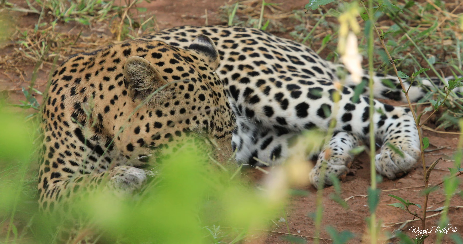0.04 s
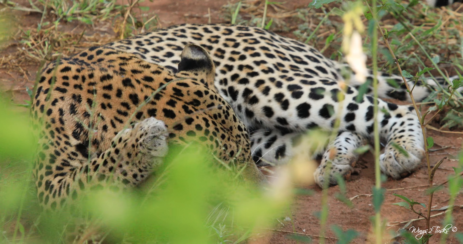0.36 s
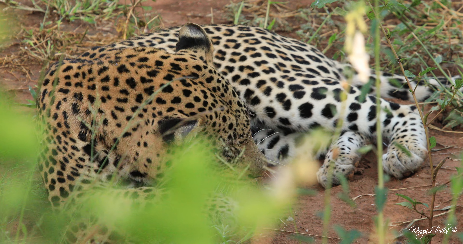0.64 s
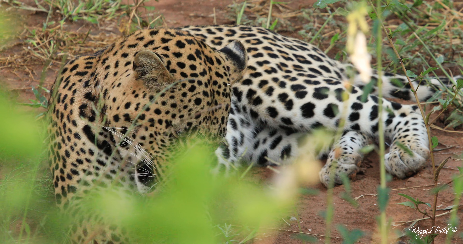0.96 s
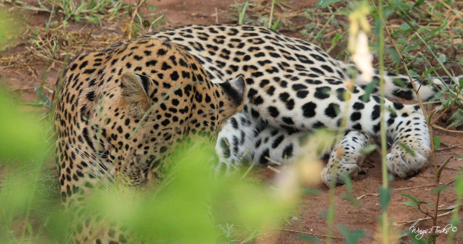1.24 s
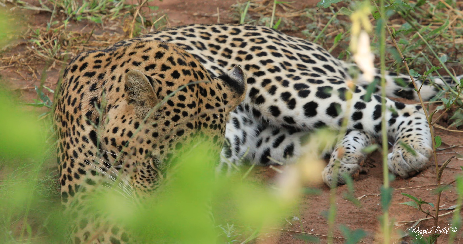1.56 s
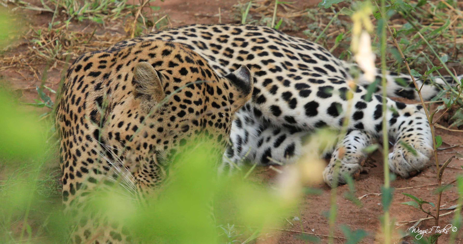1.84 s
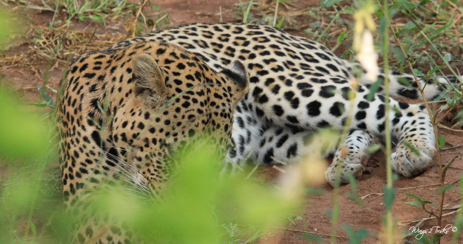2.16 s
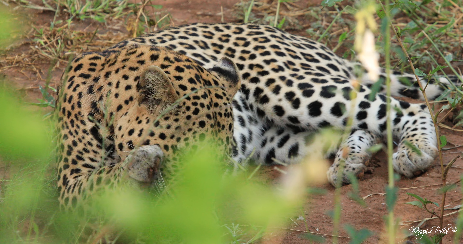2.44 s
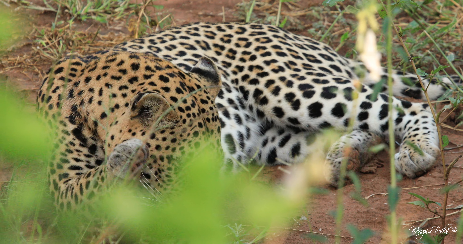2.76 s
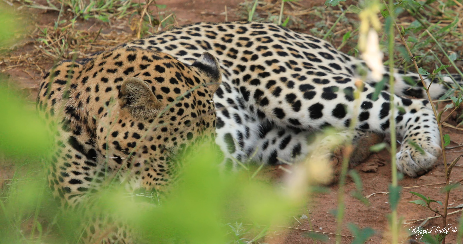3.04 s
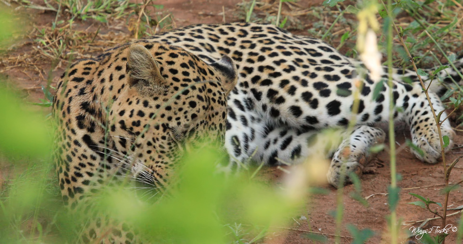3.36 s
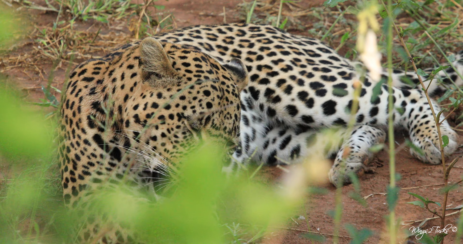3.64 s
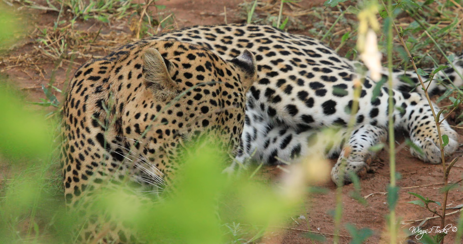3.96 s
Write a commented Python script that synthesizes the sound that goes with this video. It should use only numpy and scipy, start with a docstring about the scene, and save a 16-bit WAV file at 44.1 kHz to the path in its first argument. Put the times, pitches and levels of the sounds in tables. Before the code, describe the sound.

Cicadas drone high and steady throughout over soft outdoor air. A bird gives a short falling whistle five times, roughly once a second, while others twitter farther off. A faint distant engine hum fades by 1.3 seconds. A leopard's licking makes scattered soft wet clicks. At about 2.8 seconds a paw brushes once over dry ground, and a nearer cicada starts buzzing, its throb swelling until the end at 4 seconds.

```python
"""Cicadas drone in bushland over soft air and the hum of a distant engine, which fades.
One bird repeats a falling whistle; others glide and twitter farther off, scattered by trunks and leaves.
A leopard grooms itself, its tongue making soft wet clicks. Late on, a nearer cicada starts up and
throbs as the ribs of its two timbals buckle in turn, and a paw brushes once over dry ground."""
import sys
import numpy as np
from scipy import signal
from scipy.fft import rfft, irfft
from scipy.io import wavfile
from scipy.ndimage import uniform_filter1d

SR = 44100
rng = np.random.default_rng(int(sys.argv[2]) if len(sys.argv) > 2 else 0)


def persist_wave(psi):
    """Save psi, clipped to +-1, as 16-bit WAV."""
    counts = np.round(np.clip(psi, -1, 1) * 32767).astype(np.int16)
    wavfile.write(sys.argv[1], SR, np.atleast_2d(counts).T)


N = 176400
TIME = np.arange(N) / SR

# Tone of the air and far insects: (frequency [Hz], relative level [dB])
AIR_COLOUR = [(15, -4), (40, 0.5), (90, -5.5), (170, -3.5), (300, -11.5), (600, -11.5), (1000, -17),
              (1500, -15), (2200, -17), (3300, -19), (3800, -16), (4250, -9.5), (4800, -15.5),
              (6200, -19.5), (9000, -24.5), (11500, -22), (16000, -21.5)]
# Ride on the air's low end: (time [s], gain [dB])
AIR_BASS = [(0, 1.5), (1.5, 2), (2.6, -2.5), (3.4, -5.5), (4, -2)]
# How alike left and right are in the air: (frequency [Hz], correlation [0-1])
AIR_LIKENESS = [(30, 0.98), (120, 0.98), (280, 0.92), (1000, 0.82), (4000, 0.96), (9000, 0.63),
                (12000, 0.41), (16000, 0.35)]
# Patchy flicker of the air: (frequency [Hz], rms depth [dB])
AIR_FLICKER = [(300, 2.4), (1000, 1.58), (3000, 3.4), (4300, .7), (8000, 0.36)]
# Engine fade: (time [s], level [dB])
ENGINE_LEVEL = [(0, -53.5), (.75, -51), (1.1, -55.5), (1.35, -66), (2.5, -62), (4, -65.5)]
# Engine harmonics: (multiple of the fundamental, relative level [dB])
ENGINE_HARMONICS = [(1, 2), (2, -7.5), (3, -16.5), (4, -13)]

# Far cicadas, one a row: (burst rate [Hz], click rate [Hz], relative level [dB])
FAR_SINGERS = [(43.36, 505, 0), (41.2, 565, -3), (45.1, 410, -3)]
# Their drone: (time [s], level [dB])
FAR_LEVEL = [(0, -55), (1, -56), (2, -55.5), (4, -57)]
# Their tone: (frequency [Hz], relative level [dB])
FAR_COLOUR = [(5500, -37), (6400, -25), (6950, -6), (7450, -6), (8050, -1), (8500, -2), (9050, -3),
              (9500, -7), (9800, -18), (10100, -6), (10900, -41), (13000, -40)]
# Ringing bands of their bodies: (frequency [Hz], lift [dB])
FAR_RINGS = [(6570, 12.5), (6960, 3.5), (7430, 5), (8030, 5), (8480, 3), (9020, 10), (9400, 9.5),
             (10050, 5), (10380, 11)]

# Falling whistles: (start [s], length [s], pitch [Hz], level [dB], extra gain at the onset [dB])
FALLS = [(0.0, 0.21, 2190, -42, -13), (0.991, .195, 2220, -42, 0.5), (1.742, .21, 2212, -44, 4.5),
         (2.664, .22, 2103, -43, -13.5), (3.644, 0.2, 2154, -46, -13)]
# Contour of each fall: (position in the note [0-1], pitch [ratio], gain [dB])
FALL_SHAPE = [(0, 1.1, -6), (0.089, 1.1, -2), (0.198, 1.035, -2), (0.348, 1.005, -1), (.6, .98, -10),
              (0.818, .97, -10.5), (.93, .86, -12), (1, 0.823, -17)]
# Clear bird notes: (start [s], length [s], first pitch [Hz], middle [Hz], last [Hz], level [dB])
GLIDING_NOTES = [ (-.02, 0.24, 2710, 2850, 2664, -60.5), (.27, 0.12, 1227, 1147, 1100, -60.5),
                 (0.328, 0.2, 2746, 2870, 2670, -58), (.38, 0.067, 2100, 2080, 2060, -62.5),
                 (0.515, 0.0528, 1876, 1646, 1513, -47.5), (0.59, 0.017, 1640, 1618, 1550, -51),
                 (0.665, 0.21, 2750, 2915, 2670, -60), (0.926, .022, 2670, 2450, 2400, -51.5),
                 (0.977, 0.11, 2770, 2900, 2690, -64), (1.21, .12, 1213, 1140, 1100, -59.5),
                 (1.671, 0.023, 2550, 2400, 2350, -51), (2.234, 0.0735, 1662, 1598, 1588, -48),
                 (2.601, 0.018, 2480, 2350, 2280, -52.5), (2.92, 0.048, 1257, 1156, 1090, -60),
                 (3.48, .17, 2770, 2890, 2750, -64), (3.576, 0.029, 2570, 2550, 2430, -55),
                 (3.803, 0.14, 2770, 2870, 2780, -62.5), (3.875, 0.085, 1160, 1107, 1050, -62),
                 (3.9, 0.15, 2220, 2116, 2050, -64.5)]
# Twitters: (start [s], length [s], first pitch [Hz], middle [Hz], last [Hz], level [dB],
# rasp [share of pitch])
TWITTERS = [(0.032, 0.041, 3950, 3620, 6400, -57.5, .006), (0.07, 0.075, 6200, 5760, 4930, -58, .01),
            (0.139, 0.042, 4880, 5670, 5530, -55.5, 0.0088), (1.381, 0.11, 5140, 5250, 5090, -60, 0.012),
            (1.76, 0.075, 4330, 5520, 5500, -59, 0.012), (1.824, 0.064, 4900, 4670, 5480, -55.5, .012),
            (2.012, .045, 3310, 3074, 2860, -53.5, 0.028), (2.056, 0.048, 2800, 2980, 3620, -56.5, 0.024),
            (2.046, 0.093, 5250, 5470, 4830, -61.5, .015), (2.303, 0.062, 3050, 2830, 2580, -59.5, .02),
            (2.612, .18, 4060, 3730, 3540, -54.5, .07), (2.929, 0.13, 5700, 5530, 5540, -59, .02),
            (3.024, 0.082, 6370, 6000, 6100, -55, .03), (3.243, 0.088, 6350, 6100, 6000, -49, 0.04),
            (3.411, 0.12, 6310, 6070, 5910, -52.5, 0.031)]
# Tongue clicks: (time [s], level [dB], centre [Hz], decay [s])
LICKS = [(.019, -41, 980, 0.0016), (0.01, -49.5, 3170, .006), (.169, -55, 3000, 0.0035),
         (.175, -52.5, 690, 0.0083), (.85, -54.5, 600, 0.011), (1.288, -45, 2850, .003),
         (1.362, -53, 1610, 0.021), (1.789, -49, 970, .005), (1.92, -48.5, 800, 0.0096),
         (1.969, -45, 834, 0.011), (1.993, -44.5, 770, 0.0076), (2.181, -51, 660, .005),
         (2.303, -49, 3440, 0.0051), (2.345, -50, 1900, .007), (2.623, -53, 1240, 0.0067),
         (2.922, -50, 1180, 0.0033), (3.08, -52, 900, 0.0044), (3.65, -53.5, 585, 0.0036),
         (3.681, -42, 5900, .004), (3.49, -57, 3500, .005)]

# Near cicada's pulse: (time [s], burst rate [Hz])
NEAR_RATE = [(2.95, 39.8), (3.1, 39.5), (3.2, 37.3), (3.35, 39.5), (3.6, 41.2), (3.75, 38.8), (3.88, 38.3),
             (4, 41)]
# Ringing bands of its body: (frequency [Hz], lift [dB])
NEAR_RINGS = [(6620, 6.4), (6820, 2.5), (7040, 7.6), (8920, 3.4), (9060, 3.7), (9370, 7), (9780, 6),
              (10840, 4.4), (12700, 3)]
# Swell of its first timbal's throb: (time [s], level [dB])
THROB_LEVEL = [(2.55, -89), (2.68, -62), (2.95, -56.5), (3.2, -52.5), (3.3, -50.5), (3.6, -48.5), (4, -45)]
# Tone of the throb: (frequency [Hz], relative level [dB])
THROB_COLOUR = [(5400, -42), (6300, -13), (6600, -1), (7050, -1), (7500, 0), (8500, -5), (9050, -2),
                (9500, -8), (10300, -10), (12000, -20), (15500, -45)]
# Swell of its second timbal's higher buzz: (time [s], level [dB])
BUZZ_LEVEL = [(2.55, -71), (2.7, -54.5), (2.95, -50.5), (3.4, -51), (4, -53)]
# Tone of the buzz: (frequency [Hz], relative level [dB])
BUZZ_COLOUR = [(5500, -11), (7000, -3), (8000, 4.5), (9400, 6.5), (10800, 3), (11300, 0), (12700, -8),
               (15500, -17)]

# Paw stroke over the ground: (time [s], level [dB])
BRUSH_LEVEL = [(2.7, -90), (2.74, -58), (2.76, -43), (2.81, -35.5), (2.84, -36.5), (2.89, -45.5),
               (2.93, -51), (3.0, -73), (3.05, -100)]
# Tone of the stroke: (frequency [Hz], relative level [dB])
BRUSH_COLOUR = [(1000, -25), (2800, -12.5), (4500, -7), (6500, -1.5), (9000, -3.5), (12000, -4),
                (14000, -3.5), (16000, -17)]


def amp(db):
    """Decibels to gain."""
    return 10 ** (np.asarray(db) / 20)


def unit(x):
    """Scales to rms 1."""
    return x / np.sqrt(np.mean(x ** 2) + 1e-20)


def curve(points, t=TIME):
    """An envelope of straight lines through (time [s], value) points."""
    return np.interp(t, *np.transpose(points))


def spectrum(points, hz):
    """Joins (frequency [Hz], value) points on a log-frequency axis."""
    f, value = np.transpose(points)
    return np.interp(np.log(hz + 1), np.log(f + 1), value)


def colour(x, points):
    """EQ by a (frequency [Hz], level [dB]) table, to rms 1."""
    gain = amp(spectrum(points, np.fft.rfftfreq(len(x), 1 / SR)))
    return unit(irfft(rfft(x) * gain, len(x)))


def wander(size, hz):
    """Smooth random drift of rms near 1, rolling off above the given rate."""
    n = max(size, SR // 2)
    f = np.fft.rfftfreq(n, 1 / SR)
    return unit(irfft(rfft(rng.standard_normal(n)) * np.exp(-(f / hz) ** 2), n))[:size]


def bush(x, wet_db, t60, spread=0.05):
    """Direct sound plus scatter from trunks and leaves, in narrow stereo."""
    t = np.arange(SR) / SR
    sparse_echoes = rng.standard_normal((2, SR)) * (rng.random(SR) < .05)
    tails = sparse_echoes * amp(-60 * t / t60) * (t > .004)  # 4 ms pre-delay
    mid, side = (signal.fftconvolve(x, tail / np.linalg.norm(tail))[:N] for tail in tails)
    return x + amp(wet_db) * np.array([mid + spread * side, mid - spread * side])


def air(level_db=-52):
    """The bed: soft rumble, patchy mids and a band of far insect hiss, widest in the treble."""
    frames, hz = N // 256 + 5, np.fft.rfftfreq(1024, 1 / SR)
    mid_re, mid_im, side_re, side_im, patches = rng.standard_normal((frames, len(hz), 5)).T
    likeness = spectrum(AIR_LIKENESS, hz)[:, None]
    mid = np.sqrt(1 + likeness) * (mid_re + 1j * mid_im)
    side = np.sqrt(1 - likeness) * (side_re + 1j * side_im)
    patches = unit(uniform_filter1d(uniform_filter1d(patches, size=9, axis=0), size=9, axis=1))
    flicker_db = spectrum(AIR_FLICKER, hz)[:, None] * patches
    bass_db = curve(AIR_BASS, np.linspace(0, N / SR, frames)) / (1 + (hz[:, None] / 500) ** 2)
    gain = amp(spectrum(AIR_COLOUR, hz)[:, None] + bass_db + flicker_db)
    _, bed = signal.istft(np.array([mid + side, mid - side]) * gain, nperseg=1024, noverlap=768)
    return amp(level_db) * unit(bed[:, :N])


def engine(fundamental_hz=39.57):
    """A far engine's low hum: four wavering harmonics, fading."""
    turns = np.cumsum(fundamental_hz * (1 + 0.01494 * wander(N, hz=4.9))) / SR
    hum = np.zeros(N)
    for multiple, db in ENGINE_HARMONICS:
        strength = amp(db + 2.4 * wander(N, hz=2.2))
        hum += strength * np.sin(2 * np.pi * (multiple * turns + rng.random()))
    return unit(hum) * amp(curve(ENGINE_LEVEL))


def timbal(turns, burst_hz, click_hz, sag, width, rough):
    """Each turn is one burst: ribs buckle in a row of sharp clicks that swell, slow and fade."""
    place = (turns + .5) % 1 - .5  # 0 at the peak of the burst
    ribs = click_hz / burst_hz * (place - sag * place ** 2)
    samples_from_click = ((ribs + .5) % 1 - .5) * SR / click_hz
    clicks = np.sinc(samples_from_click) * np.exp(-(samples_from_click / 10) ** 2)
    rasp = np.exp(-(ribs % 1) * 2) * rng.standard_normal(N)
    swell = np.exp(-(place / width) ** 2)
    return (unit(clicks) + rough * unit(rasp)) * swell


def ring(x, bands, width_hz):
    """A cicada's body: narrow resonances ring on top of the sound, to rms 1."""
    f = np.fft.rfftfreq(N, 1 / SR)
    gain = 1 + sum(amp(db) / (1 + 2j * (f - hz) / width_hz) for hz, db in bands)
    return unit(irfft(rfft(x) * gain, N))


def far_cicadas():
    """Three cicadas heard as scatter from the bush, over the merged hiss of others farther off."""
    song = np.zeros(N)
    for burst_hz, click_hz, level in FAR_SINGERS:
        turns = np.cumsum(burst_hz * (1 + 0.00053 * wander(N, hz=2.72))) / SR
        song += amp(level) * unit(timbal(turns, burst_hz, click_hz, sag=.06, width=0.53, rough=0.28))
    song = ring(colour(song, FAR_COLOUR), FAR_RINGS, width_hz=100)
    drone = unit(bush(song, wet_db=18, t60=.3))
    hiss = ring(colour(rng.standard_normal(N), FAR_COLOUR), FAR_RINGS, width_hz=38)
    return unit(drone + 0.45 * hiss) * amp(curve(FAR_LEVEL))


def whistle(hz, waver, flutter_db=2.5):
    """A bird's near-pure tone, slightly unsteady in pitch and strength."""
    turns = np.cumsum(hz * (1 + waver * wander(len(hz), hz=69.4))) / SR
    return np.sqrt(2) * np.sin(2 * np.pi * turns) * amp(flutter_db * wander(len(hz), hz=82))


def falling_whistles(opening_share=0.48):
    """The nearest bird: each whistle slides down and ends in a quick drop."""
    calls = np.zeros(N)
    position, ratio, shape_db = np.transpose(FALL_SHAPE)
    for start, length, hz, level, onset_db in FALLS:
        progress = np.arange(0, length, 1 / SR) / length
        tone = whistle(hz * np.interp(progress, position, ratio), waver=0.015, flutter_db=3.5)
        fade = np.clip(np.minimum(progress, 1 - progress) / .03, 0, 1)
        contour_db = np.interp(progress, position, shape_db)
        opening_db = onset_db * np.maximum(1 - progress / opening_share, 0)
        add(calls, start, tone * fade * amp(level + contour_db + opening_db))
    close_scatter = bush(calls, wet_db=-4, t60=.22).mean(axis=0)
    return bush(close_scatter, wet_db=-16, t60=1.1, spread=.35)


def add(mix, start, sound):
    """Lays a sound into the mix at its start time [s]."""
    at = round(start * SR)
    sound = sound[max(-at, 0):]
    part = mix[max(at, 0):][:len(sound)]
    part += sound[:len(part)]


def glide(length, pitches):
    """A pitch arc through a first, middle and last pitch, and its swell."""
    progress = np.arange(0, length, 1 / SR) / length
    arc = np.polyval(np.polyfit([0, .5, 1], pitches, 2), progress)
    return arc, np.sin(np.pi * progress) ** 0.5


def other_birds(rasp_hz=332):
    """Farther birds: clear gliding notes, and twitters made scratchy by fast pitch jitter."""
    notes, twitters = np.zeros((2, N))
    for start, length, *pitches, level in GLIDING_NOTES:
        hz, swell = glide(length, pitches)
        add(notes, start, whistle(hz, waver=0.0045) * swell * amp(level))
    for start, length, *pitches, level, rasp in TWITTERS:
        hz, swell = glide(length, pitches)
        scratchy_hz = hz * (1 + rasp * wander(len(hz), rasp_hz))
        add(twitters, start, whistle(scratchy_hz, waver=0.0034) * swell * amp(level))
    return bush(notes, wet_db=-7.5, t60=0.29) + bush(twitters, wet_db=-7, t60=0.27)


def distant_chorus(calls_per_s=22, centre_hz=994, level_db=-65.5):
    """Faint falling calls at random moments, blurred together by the bush."""
    calls = np.zeros(N)
    fall, swell = glide(length=0.0727, pitches=(1.05, 0.98, .95))
    for when, pitch, strength in rng.random((round(calls_per_s * N / SR), 3)):
        tone = whistle(fall * centre_hz * (.85 + .3 * pitch), waver=0.0467)
        add(calls, when * N / SR, tone * swell * (.5 + strength))
    return unit(bush(calls, wet_db=3.5, t60=0.95)) * amp(level_db)


def tongue_licks(width_octaves=0.28, attack_s=0.00017):
    """The leopard's tongue: each soft wet click is a band of noise that snaps on and dies away."""
    licks = np.zeros(N)
    t, hz = np.arange(4096) / SR, np.fft.rfftfreq(4096, 1 / SR)
    for start, level, centre, decay in LICKS:
        band = 1 / (1 + (np.log2((hz + 1) / centre) / width_octaves) ** 2) ** 0.77
        noise = irfft(rfft(rng.standard_normal(len(t))) * band)
        smack = noise * (1 - np.exp(-t / attack_s)) * np.exp(-t / decay)
        add(licks, start, unit(smack) * np.sqrt(decay / t[-1]) * amp(level))
    return licks


def near_cicada(click_hz=438, sag=.075, beat_s=3.490):
    """Two timbals alternate: a high buzz leads, then a deep throb swells through it."""
    burst_hz = curve(NEAR_RATE)
    turns = np.cumsum(burst_hz) / SR
    turns -= np.interp(beat_s, TIME, turns)  # one throb peaks at beat_s
    throb = timbal(turns, burst_hz.mean(), click_hz, sag, width=.25, rough=.3)
    buzz = timbal(turns + .6, burst_hz.mean(), click_hz, sag, width=0.64, rough=2.4)  # fills the gaps
    throb = ring(colour(throb, THROB_COLOUR), NEAR_RINGS, width_hz=76)
    buzz = ring(colour(buzz, BUZZ_COLOUR), NEAR_RINGS, width_hz=37)
    song = throb * amp(curve(THROB_LEVEL)) + buzz * amp(curve(BUZZ_LEVEL))
    return bush(song, wet_db=-3, t60=.03, spread=.08)


def paw_brush():
    """A paw sweeps dry ground: one bright, grainy swish."""
    grains = rng.standard_normal(N) * amp(1.1 * wander(N, hz=700))
    return colour(grains, BRUSH_COLOUR) * amp(curve(BRUSH_LEVEL))


def scene():
    """The stereo mix, with the leopard almost dry against the bush."""
    bed = air() + engine()
    cicadas = far_cicadas() + near_cicada()
    birds = falling_whistles() + other_birds() + distant_chorus()
    leopard = bush(tongue_licks() + paw_brush(), wet_db=-19, t60=.15)
    return bed + cicadas + birds + leopard


def record(dry):
    """A steep low-pass trims the very top of the treble."""
    cutoff_hz = 15850
    lowpass = signal.firwin(511, cutoff_hz, window=("kaiser", 9), fs=SR)
    return signal.oaconvolve(dry, lowpass[None], "same")


dry = scene()
out = record(dry)
persist_wave(out)
```